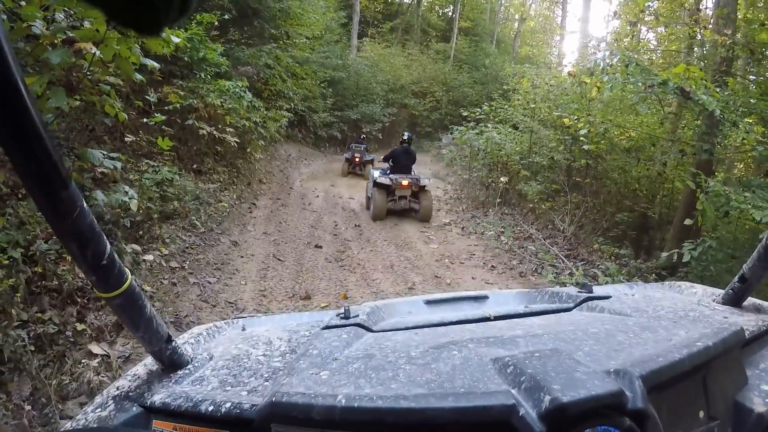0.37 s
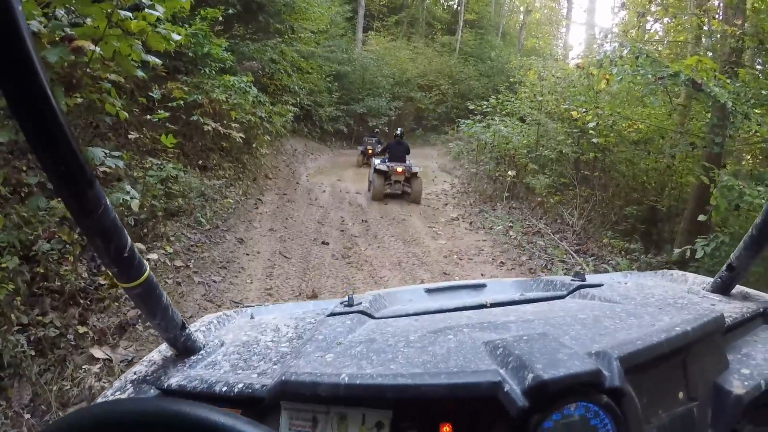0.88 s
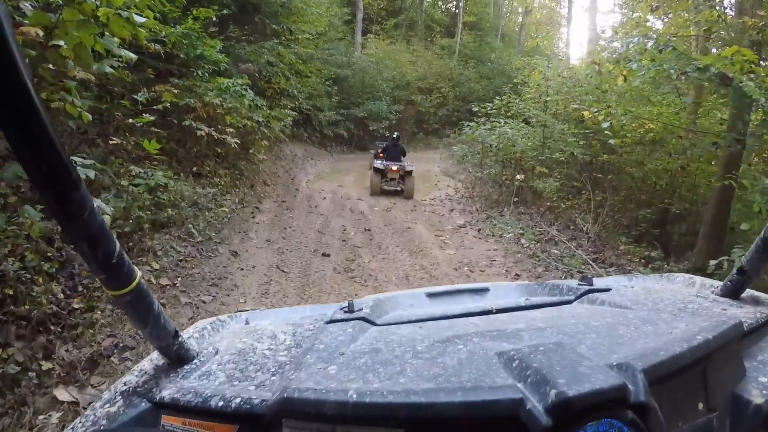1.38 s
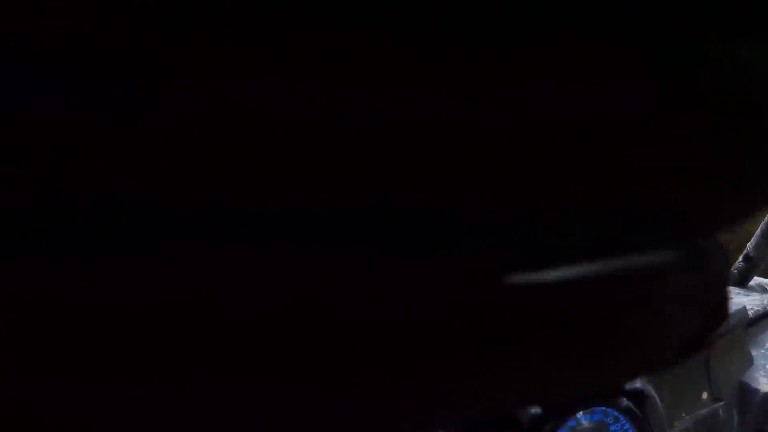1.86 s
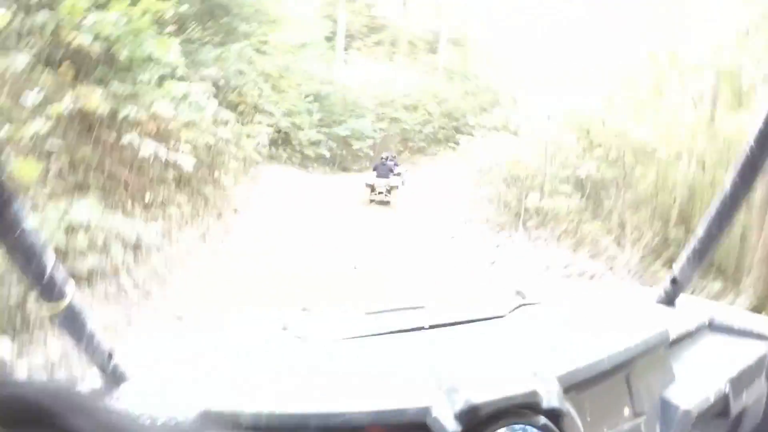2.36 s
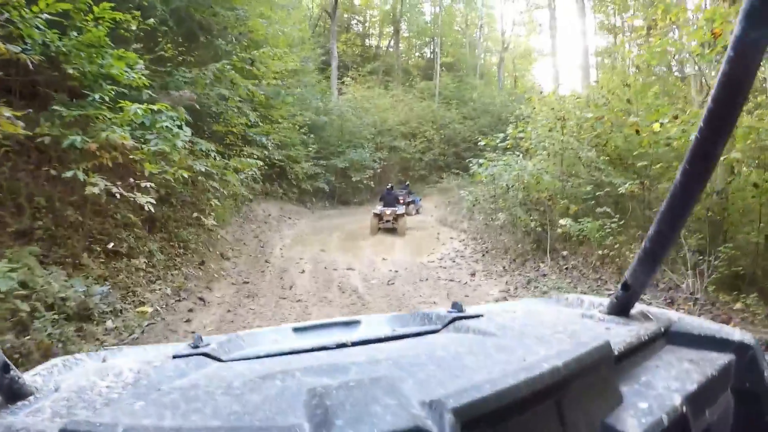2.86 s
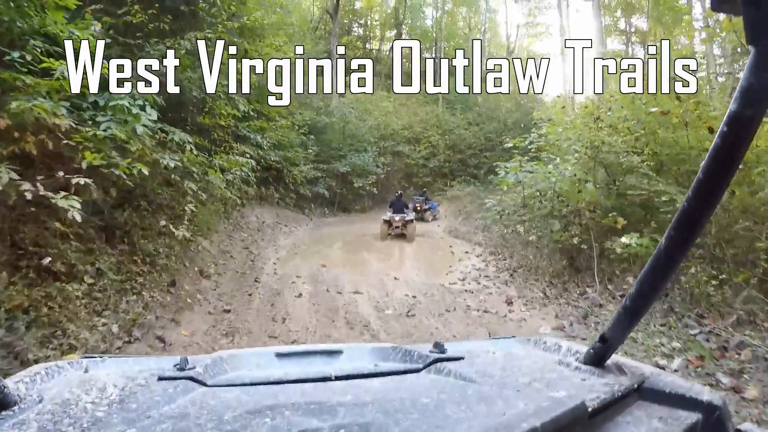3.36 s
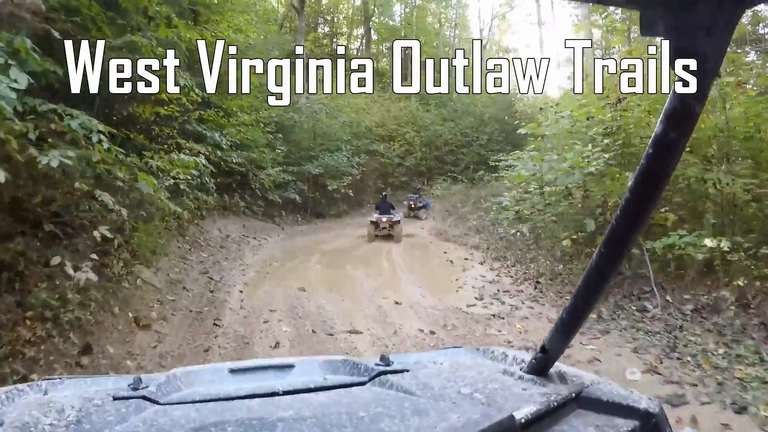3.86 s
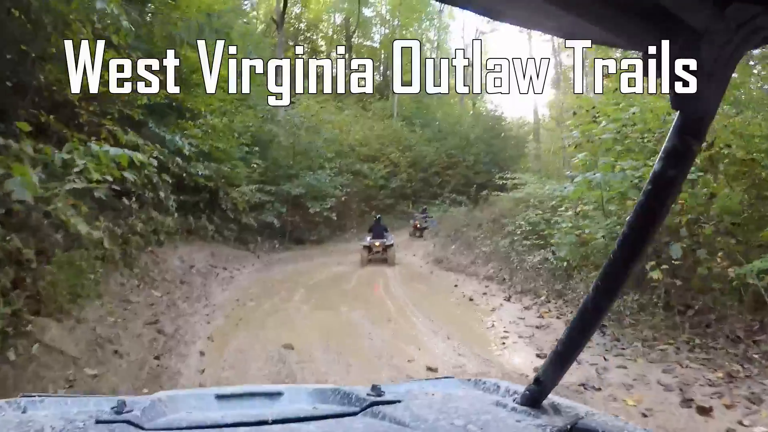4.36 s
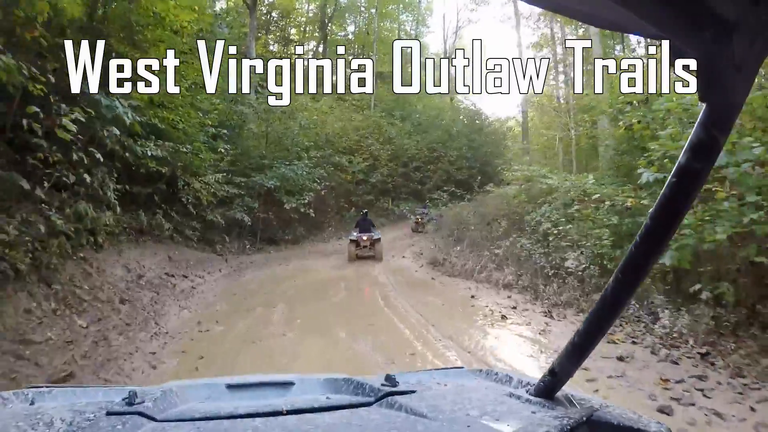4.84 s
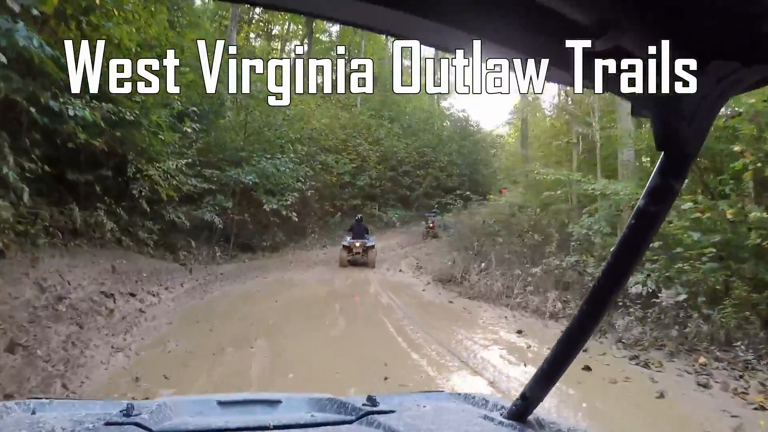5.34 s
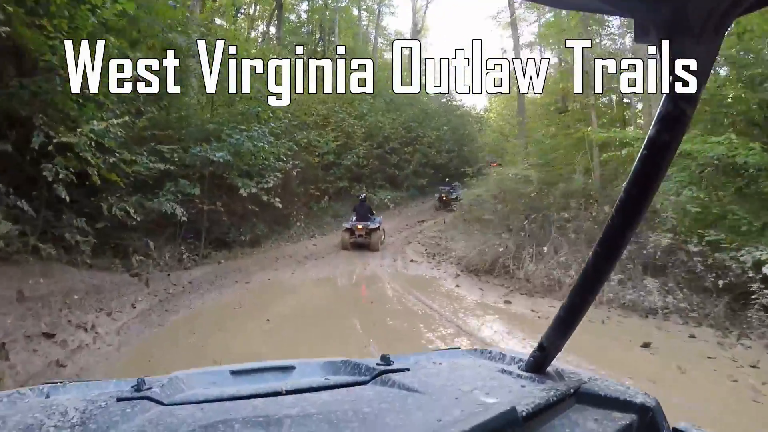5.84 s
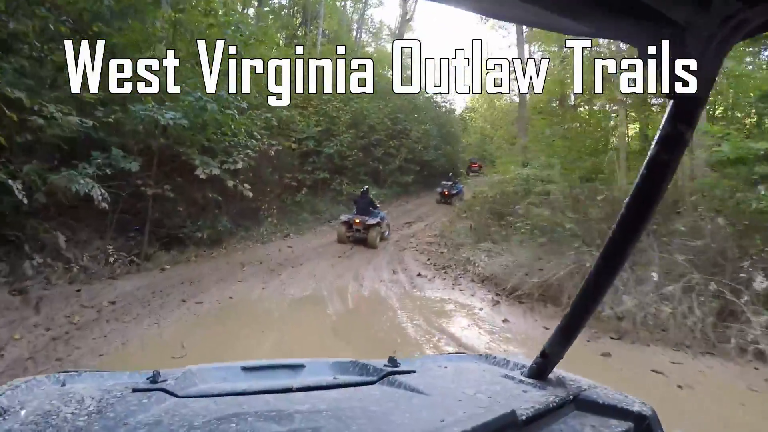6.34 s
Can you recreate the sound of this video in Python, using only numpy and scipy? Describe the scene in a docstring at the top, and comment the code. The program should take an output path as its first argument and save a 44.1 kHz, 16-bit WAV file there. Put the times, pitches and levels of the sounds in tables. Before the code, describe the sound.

Close inside the cab of a small two-cylinder off-road vehicle on a wooded dirt trail. At 0 s a decaying low hum and a sharp rattle open over a lumpy idle, which blips up by 0.5 s, dips and settles. Faint tones, a grainy whirr, bright scuffs and clicks sit around it; a knock lands on the microphone housing at 1 s. From 1.5 s the revs climb, with handling bumps at 1.8-2.1 s and a deep thud near 2.26 s. By 2.8 s the exhaust is a loud, boomy growl, holding fairly steady with drivetrain clatter, ground rumble and loose plastic and metal rattles, notably around 3.1 and 4.5 s. The dull, almost mono sound opens into brighter stereo from 4.1 to 5.8 s. Revs peak near 5.8 s as wet mud spray swells softly, then drop a little until the end at about 6.5 s.

```python
"""The exhaust of a small two-cylinder off-road vehicle booms through the cab: orders of the engine cycle that
rise from idle as it pulls away on a dirt trail, heard close up on a helmet camera worn inside.
Around it the drive clatters (pulsing noise), loose plastic and metal rattle (struck modes) and a glove or a rut
bumps the housing (decaying swings). Behind lie ground rumble, a whirr, scuffs, mud spray and faint tones (shaped
noise and sines). The camera starts in a dull, nearly mono wind mode and blends to its brighter stereo pair."""
import sys
import numpy as np
from scipy import signal
from scipy.fft import rfft, irfft, next_fast_len
from scipy.io import wavfile

SR = 44100
rng = np.random.default_rng(int(sys.argv[2]) if len(sys.argv) > 2 else 0)


def generate_wav(signal):
    """Clip the signal to [-1, 1] and save it as 16-bit WAV at the path in sys.argv[1]."""
    frames = np.transpose(np.atleast_2d(signal))
    scaled = np.clip(frames, -1, 1) * 32767
    pcm = np.round(scaled).astype(np.int16)
    wavfile.write(sys.argv[1], SR, pcm)


def volts(x):
    """Linear amplitude factor 10**(x/20) for a level x in dB, scalar or array-like."""
    e = np.asarray(x, float) / 20
    return 10 ** e


N = 284886  # samples


def unit(x):
    """Scales x to rms 1."""
    return x / np.sqrt(np.mean(x ** 2) + 1e-20)


def along(points, hz):
    """Reads (Hz, value) points on a log frequency axis."""
    f, v = np.transpose(points)
    return np.interp(np.log(hz + 1), np.log(f + 1), v)


def curves(rows):
    """Draws one value per sample for each column after the time."""
    s, *columns = np.transpose(rows)
    return [np.interp(np.arange(N) / SR, s, column) for column in columns]


def wobble(rate):
    """Draws a random curve through normal knots, rate knots a second."""
    knots = rng.standard_normal(int(N * rate / SR) + 4)
    return np.interp(np.arange(N) * rate / SR, np.arange(len(knots)), knots)


def coloured(x, spectrum):
    """Filters x through a (Hz, dB) spectrum."""
    m = next_fast_len(N + 8192)
    gain = volts(along(spectrum, np.fft.rfftfreq(m, 1 / SR)))
    return irfft(rfft(x, m) * gain, m)[..., :N]


def noise(spectrum):
    """Makes coloured noise of rms 1."""
    return unit(coloured(rng.standard_normal(N), spectrum))


# Engine speed. Each row: time in seconds, engine cycles in Hz.
ENGINE_SPEED = [(0.0, 10.7), (0.11, 13.2), (0.2, 15.3), (0.32, 17.3), (0.49, 19.8), (0.52, 20.0),
                (0.81, 17.7), (1.24, 19.4), (1.48, 20.0), (1.93, 24.3), (2.41, 29.0), (2.55, 32.7),
                (2.64, 34.8), (2.7, 35.6), (2.84, 36.1), (3.27, 39.0), (3.49, 38.8), (3.67, 39.6),
                (3.96, 38.7), (4.1, 37.8), (4.68, 37.5), (5.0, 40.9), (5.42, 41.9), (5.52, 42.8),
                (5.83, 43.4), (6.15, 39.7), (6.41, 38.2), (6.46, 37.5)]
# How hard the engine pulls. Each row: time in seconds, share 0-1.
ENGINE_LOAD = [(0, 0), (.3, 0.2), (.7, 0.06), (1.2, 0.05), (1.7, 0.2), (2.2, 0.18), (2.4, 0.43),
               (2.7, 0.78), (3.4, 0.87), (3.9, 0.78), (4.8, 0.82), (5.3, 0.73), (5.75, 1), (6.1, 0.47),
               (6.46, 0.75)]
# Level of the odd bark orders over time. Each row: time in seconds, change of level in dB.
ODD_ORDER_LEVEL = [(0, -0.5), (2.5, -1), (4.8, 0.5), (5.3, -4.5), (5.8, -25.5), (6.1, 3.5), (6.46, -5)]
# Low orders. Each row: order, idle level in dB, rise at full load in dB, change as the clutch grips in dB.
BOOM_ORDERS = [(1, -11.5, 16.5, .5), (3, -29, 22.5, 1), (4, -3.5, 3.5, .5), (5, -2.5, 0, -12)]
# How the cab passes the low orders. Each row: frequency in Hz, gain in dB.
CAB_RESPONSE = [(25, -27), (36, -22), (46, -17), (60, -19), (75, -14), (90, -12), (104, -10), (116, -10.5),
                (122, -9.5), (130, -18.5), (141, -16.5), (151, -26), (158, -16.5), (167, -14.5),
                (176, -15.5), (195, -15), (220, -17)]
# Middle orders of the bark. Each row: order, relative level in dB.
BARK_ORDERS = [(2, -5), (6, -7), (7, -7.5), (8, -7), (9, -3)]
# Upper orders of the bark. Each row: order, relative level in dB.
UPPER_ORDERS = [(10, 1), (11, -1.5), (12, -4), (13, -6), (14, -8), (15, -15), (16, -4.5), (17, -5),
                (18, -11), (19, -11), (20, -8.5), (21, -10), (22, -17.5), (24, -17), (26, -13.5), (28, -11),
                (30, -16.5)]
# Exhaust resonances that lift the bark orders passing them. Each row: centre in Hz, half width in Hz, lift in dB.
PIPE_RESONANCES = [(324, 65, 1), (615, 50, 8), (785, 40, 9), (1180, 60, 6)]
# An upper order rings out. Each row: order, centre in seconds, half length in seconds, level in dB.
SINGING_ORDERS = [(28, 5.25, .25, -42), (13, 5.5, .2, -40), (17, 5.74, .13, -30), (20, 6.15, .15, -35)]


def exhaust():
    """Sums orders of the engine cycle; each wavers from firing to firing, the high ones most."""
    t = np.arange(N) / SR
    (hz,), (odd_db,), (load,) = curves(ENGINE_SPEED), curves(ODD_ORDER_LEVEL), curves(ENGINE_LOAD)
    # the crank runs a little early or late (radians)
    phase = 2 * np.pi * np.cumsum(hz) / SR + 0.068 * wobble(14)
    clutch_hz, clutch_span_hz = 24.4, 0.6
    grip = 1 / (1 + np.exp((clutch_hz - hz) / clutch_span_hz))

    levels = []
    for order, idle_db, rise_db, grip_db in BOOM_ORDERS:
        order = round(order)
        engine_db = idle_db + rise_db * load + grip_db * grip
        levels.append((order, engine_db + along(CAB_RESPONSE, order * hz) + 1.86 * wobble(6)))

    bark_db = -36.5 + 19.5 * load
    # the upper bark thins out above 40.9 Hz, by 2 dB per Hz
    upper_db = -43.5 + 8 * load - 2 * np.maximum(hz - 40.9, 0)
    for table, table_db in (BARK_ORDERS, bark_db), (UPPER_ORDERS, upper_db):
        for order, own_db in table:
            pipe_db = sum(lift / (1 + ((order * hz - centre) / width) ** 2)
                          for centre, width, lift in PIPE_RESONANCES)
            waver_db = 1.3 * wobble(10) + 2.2 * wobble(2.487)
            levels.append((order, table_db + own_db + order % 2 * odd_db + waver_db + pipe_db))

    orders = 0
    for order, db in levels:
        # every fourth order lines up into four pressure peaks a cycle; the pipe scatters the rest
        lag = 0.37 * order ** 2 * (order % 4 > 0)
        # slow firing blurs the orders above the fifth
        looseness = 0.042 * order * (38 / hz if order > 5 else 1)
        orders = orders + volts(db) * np.cos(order * phase - lag + looseness * wobble(20))
    singing = sum(volts(db) * np.exp(-((t - s) / half) ** 4) * np.sin(round(order) * phase)
                  for order, s, half, db in SINGING_ORDERS)
    return np.sqrt(2) * (orders + singing)


# Clatter along the way, before the gain in the mix. Each row: time in seconds, level in dB.
DRIVE_LEVEL = [(0, -30.5), (.5, -34), (1.3, -36), (2.3, -34.5), (3.2, -30), (4.2, -31), (4.8, -31),
               (5.5, -29.5), (6.46, -28)]
# Clatter shared by both microphone ports. Each row: frequency in Hz, relative level in dB.
CLATTER_SHARED = [(180, -20.5), (300, -5), (348, -1), (410, -15.5), (507, -12.5), (692, -16.5), (929, -16),
                  (1230, -15), (2610, -22.5), (7560, -25.5), (9820, -35), (11400, -46.5), (15000, -46)]
# Clatter that differs between the ports. Each row: frequency in Hz, relative level in dB.
CLATTER_DIFFERENCE = [(18, -43), (30, 3), (129, -3.5), (167, -13), (222, 1), (312, -21.5), (346, 1),
                      (461, -11), (795, -6.5), (1740, -9), (2700, -15.5), (7450, -16.5), (15000, -40.5)]


def clatter(spectrum):
    """Valve gear, belt and tyres: noise that pulses with the engine cycle."""
    phase = 2 * np.pi * np.cumsum(curves(ENGINE_SPEED)[0]) / SR
    beat = 1 + 0.11 * np.cos(phase + 0.54)
    level_db = curves(DRIVE_LEVEL)[0] + 0.44 * wobble(10) + 0.71 * wobble(22)
    return volts(level_db) * beat * noise(spectrum)


# The dry click of a contact. Each row: frequency in Hz, relative level in dB.
CONTACT_CLICK = [(150, -16), (500, 6), (1300, 4), (2300, 3), (4500, -14), (7000, -6.5), (12000, -33.5)]


def struck(blows, modes):
    """Blows click and ring each mode, at strengths that change from blow to blow."""
    t = np.arange(SR // 16) / SR
    click_decay = volts(-8 - 60 * t / 0.019)
    out = signal.oaconvolve(np.abs(blows), click_decay)[:N] * noise(CONTACT_CLICK)
    for hz, db, t60 in modes:
        onset = 1 - np.exp(-t / 0.0006)
        ring = volts(db - 60 * t / t60) * np.sin(2 * np.pi * hz * t) * onset
        out = out + signal.oaconvolve(blows * volts(4.5 * wobble(120)), ring)[:N]
    return out


# Clear contacts of loose parts. Each row: time in seconds, strength of the blow in dB.
CLEAR_CONTACTS = [(0.0418, -9), (0.162, -21), (0.873, -15), (0.9975, -13), (1.0593, -23.5), (1.214, -20),
                  (1.6713, -16.5), (1.8083, -19), (2.192, -17), (2.791, -19.5), (3.019, -23),
                  (3.086, -16.5), (3.24, -22), (4.407, -17.5), (4.555, -11.5), (4.947, -10)]
# Bursts of quick contacts. Each row: centre in seconds, half length in seconds, strength in dB, metal share 0-1.
CONTACT_BURSTS = [(0.074, 0.018, -31.5, 0.5), (0.188, 0.029, -26.5, 0.45), (1.014, 0.0075, -28, 0.06),
                  (1.226, 0.038, -40, 0.7), (1.841, 0.086, -35.5, 0.3), (1.915, 0.027, -40, 0.6),
                  (2.107, 0.035, -31.5, 0.1), (2.262, 0.02, -31, 0), (3.1, 0.011, -26, 0.9),
                  (3.126, 0.012, -27.5, 0.7), (3.175, 0.011, -30.5, 0.9), (3.65, 0.012, -25.5, 0.4),
                  (3.708, 0.008, -30, 0.9), (4.268, 0.038, -30.5, 0.6)]
# Ringing of the plastic parts. Each row: frequency in Hz, level in dB, 60 dB decay in seconds.
PLASTIC_MODES = [(412, -1.5, 0.02), (712, -2.5, 0.015), (1415, -9, 0.012), (1810, -4, 0.019),
                 (2380, -7.5, 0.013), (3860, -7, 0.01)]
# Ringing of the metal parts. Each row: frequency in Hz, level in dB, 60 dB decay in seconds.
METAL_MODES = [(1020, -7, .025), (1250, 0, .03), (1900, -6, .02), (2250, -6, .02), (2750, -8, .02),
               (4100, -9, .018), (4620, -3, .02), (4950, -8, .018)]


def rattles():
    """Loose plastic and metal parts: clear contacts, bursts over rough ground and a faint steady chatter."""
    t, plastic, metal = np.arange(N) / SR, np.zeros(N), np.zeros(N)
    metal_share = 0.47  # of a clear contact
    for s, db in CLEAR_CONTACTS:
        metal[round(s * SR)] = volts(db) * metal_share
        plastic[round(s * SR)] = volts(db) * (1 - metal_share)
    for s, half, db, share in CONTACT_BURSTS:
        hits = (rng.random(N) < 1300 / SR) * rng.standard_normal(N)  # 1300 a second on average
        burst = volts(db) * np.exp(-((t - s) / half) ** 2) * hits
        metal = metal + np.clip(share, 0, 1) * burst
        plastic = plastic + np.clip(1 - share, 0, 1) * burst
    chatter = (rng.random(N) < 150 / SR) * rng.standard_normal(N)  # 150 a second on average
    plastic = plastic + volts(-30) * chatter
    return struck(plastic, PLASTIC_MODES) + struck(metal, METAL_MODES)


# Pushes on the camera housing. Each row: start in seconds, thud level in dB, knock level in dB.
HOUSING_BUMPS = [(.995, -15, -11), (1.2, -19, -32), (1.84, -17, -26), (2.08, -24, -17), (2.094, -24, -11),
                 (2.114, -28, -13), (2.26, -5.5, -16), (4.05, -20, -26), (4.2, -22, -20), (4.8, -20, -26),
                 (5, -18, -18), (5.86, -20, -24)]
# The shell of the camera. Each row: frequency in Hz, level relative to the knock in dB, 60 dB decay in seconds.
HOUSING_MODES = [(95, -4, .07), (190, 0, .05), (340, -1, .04), (430, -3, .03), (800, -9, .025)]
# Low hums that decay, one from the very start. Each row: start in seconds, level in dB, pitch in Hz,
# 60 dB decay in seconds.
LOW_HUMS = [(0, -8.5, 111.4, 1), (.72, -19.5, 120, 0.54)]


def bumps():
    """A glove or a rut pushes the housing: a soft low swing and a knock on the shell; low hums decay."""
    out, t = np.zeros(N + SR), np.arange(SR // 2) / SR

    def swing(hz, db, t60):
        """A sine that sets in softly and decays."""
        onset = 1 - np.exp(-t * hz * 10.0)
        return volts(db - 60 * t / t60) * onset * np.sin(2 * np.pi * hz * t)

    for s, thud_db, knock_db in HOUSING_BUMPS:
        thud = swing(40, thud_db, 0.12)
        knock = sum(swing(hz, knock_db + db + rng.normal(0, 4.4), t60) for hz, db, t60 in HOUSING_MODES)
        out[round(s * SR):][:len(t)] += thud + knock
    for s, db, hz, t60 in LOW_HUMS:
        out[round(s * SR):][:len(t)] += swing(hz, db, t60)
    return out[:N]


# Roughness under the wheels. Each row: time in seconds, rumble level in dB.
GROUND_ROUGHNESS = [(0, -22), (1.2, -23), (2.3, -26), (3.6, -26), (4.05, -20), (4.3, -21), (4.6, -26),
                    (6.46, -25)]
# Low rumble of the body. Each row: frequency in Hz, relative level in dB.
RUMBLE_SPECTRUM = [(10, -23), (25, -1.5), (50, -3.5), (90, 1.5), (120, 3.5), (160, -6), (300, -15),
                   (600, -27), (900, -53.5)]


def rumble():
    """The chassis shudders over the ground: low noise that sways in level."""
    return volts(curves(GROUND_ROUGHNESS)[0] + 1.8 * wobble(5.1)) * noise(RUMBLE_SPECTRUM)


# Tyres in wet mud. Each row: frequency in Hz, relative level in dB.
SPRAY_SPECTRUM = [(500, -40), (900, -5.5), (1700, 0.5), (2600, -8.5), (6500, -3.5), (9000, -14),
                  (13000, -39)]


def spray():
    """Spray swells as the wheels reach the mud: separate noise at each port."""
    t = np.arange(N) / SR
    from_s, rise_s = 5.5, 0.3  # half way up, time scale
    swell = volts(-34.5 + 2.3 * wobble(28)) / (1 + np.exp((from_s - t) / rise_s))
    return swell * np.array([noise(SPRAY_SPECTRUM), noise(SPRAY_SPECTRUM)])


# Brief bright scuffs. Each row: centre in seconds, half length in seconds, level in dB.
SCUFF_TIMES = [(.09, .012, -41), (.2, .04, -44), (.44, .006, -40), (.53, .013, -35), (.96, .01, -41),
               (1.235, .02, -42), (1.83, .015, -40), (2.275, .012, -39)]
# Colour of a scuff. Each row: frequency in Hz, relative level in dB.
SCUFF_SPECTRUM = [(2500, -45.5), (4500, -6.5), (6300, 2.5), (8000, -8), (13000, -15.5), (16000, -20.5)]


def scuffs():
    """Bright scuffs come and go: short swells of one treble noise."""
    t = np.arange(N) / SR
    swells = sum(volts(db) * np.exp(-((t - s) / half) ** 2) for s, half, db in SCUFF_TIMES)
    return swells * noise(SCUFF_SPECTRUM)


# A grainy whirr at idle. Each row: frequency in Hz, relative level in dB.
WHIRR_SPECTRUM = [(900, -38), (1450, -6.5), (1850, -2.5), (2200, -7.5), (3200, -39)]


def whirr():
    """An idle whirr dies away: band noise made grainy by quick random changes of level."""
    t = np.arange(N) / SR
    ends_s, fade_s = 1.35, 0.15  # half way down, time scale
    return volts(-39 + 3.5 * wobble(30)) / (1 + np.exp((t - ends_s) / fade_s)) * noise(WHIRR_SPECTRUM)


# Faint steady tones at idle. Each row: centre in seconds, half length in seconds, pitch in Hz, level in dB.
IDLE_TONES = [(.2, 0.41, 207, -33), (.2, 0.32, 370, -31.5), (.55, .3, 312, -38), (1.246, 0.61, 398, -39),
              (1.622, 0.24, 357.6, -28.5)]


def tones():
    """Faint tones of nearly fixed pitch come and go under the idle: sines that waver in level and phase."""
    t, out = np.arange(N) / SR, 0
    for s, half, hz, db in IDLE_TONES:
        level = volts(db + 3.3 * wobble(8)) * np.exp(-((t - s) / half) ** 4)
        out = out + level * np.sin(2 * np.pi * hz * t + 0.8 * wobble(11))
    return out


# Clatter that favours the right port. Each row: frequency in Hz, gain in dB.
RIGHT_CLATTER = [(500, -34.5), (1000, -3), (1600, -15.5), (8000, -41.5), (12000, -4.5)]
# Share of the exhaust that differs between the ports. Each row: frequency in Hz, gain in dB.
EXHAUST_DIFFERENCE = [(40, -28), (170, -25), (400, -22), (700, -8), (1300, -3)]


def scene():
    """Everything reaches both ports; clatter, rattles, upper exhaust and spray differ between them."""
    engine, hits, drive = exhaust(), rattles(), volts(4.0) * clatter(CLATTER_SHARED)
    mid = engine + drive + hits + bumps() + rumble() + tones()
    side = volts(1.0) * clatter(CLATTER_DIFFERENCE) - 0.59 * hits - coloured(drive, RIGHT_CLATTER)
    side = side + coloured(engine, EXHAUST_DIFFERENCE)
    return np.array([mid + side, mid - side]) + spray() + scuffs() + whirr()


# Dull response of the wind mode. Each row: frequency in Hz, gain in dB.
WIND_MODE_RESPONSE = [(300, 0.5), (1200, -1.5), (1850, -3.5), (2150, -2), (2400, -6), (2750, -2),
                      (3200, -3.5), (3800, -3.5), (5500, -4), (7000, -9.5), (8500, -17), (10500, -14.5),
                      (12000, -7.5), (15000, -4)]


def microphones(dry):
    """Blends from nearly mono, with faint hiss that differs between the channels above 11 kHz, to stereo."""
    from_s, full_s = 4.14, 5.78
    u = np.clip((np.arange(N) / SR - from_s) / (full_s - from_s), 0, 1)
    share = u * u * (3 - 2 * u)
    mid, side = dry.mean(axis=0), (dry[0] - dry[1]) / 2
    narrow_side = coloured(side, [(8000, -26.5), (11000, -35.0), (12000, -6.0), (15000, -1.5)])  # Hz, dB
    mid = share * mid + (1 - share) * coloured(mid, WIND_MODE_RESPONSE)
    side = share * side + (1 - share) * narrow_side
    return np.array([mid + side, mid - side])


def gain_control(x):
    """Turns the gain down just after loud moments and back up in the gaps."""
    level_db, squeeze, memory_s = -8.0, 0.19, 0.029
    reference = volts(2 * level_db)  # as power
    keep = np.exp(-1 / (memory_s * SR))
    power = signal.lfilter([1 - keep], [1, -keep], np.mean(x ** 2, axis=0), zi=[reference])[0]
    return x * (power / reference + 0.05) ** (-squeeze / 2)  # 0.05 limits the gain in the gaps


def round_peaks(x):
    """Bends peaks smoothly towards a ceiling of 0.9."""
    return x / (1 + np.abs(x / 0.9) ** 6) ** (1 / 6)


def top_cut(x):
    """Nothing passes above the cut-off."""
    return signal.sosfilt(signal.butter(12, 15190, fs=SR, output="sos"), x)


def record(dry):
    """The helmet camera: its microphones, its gain control and its rounded peaks."""
    finished = round_peaks(gain_control(microphones(dry)))
    return top_cut(finished)


dry = scene()
out = record(dry)
generate_wav(out)
```